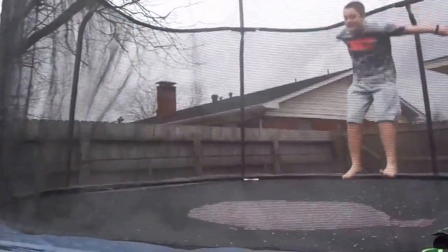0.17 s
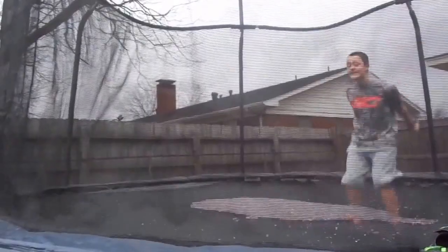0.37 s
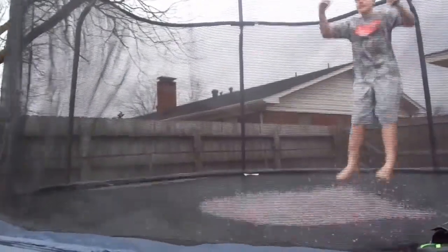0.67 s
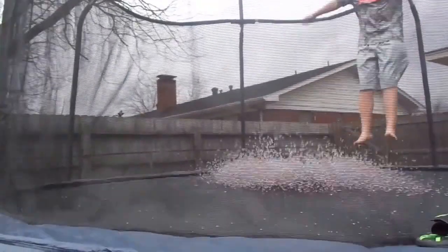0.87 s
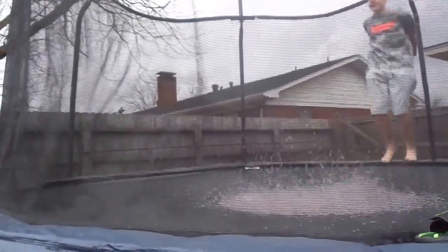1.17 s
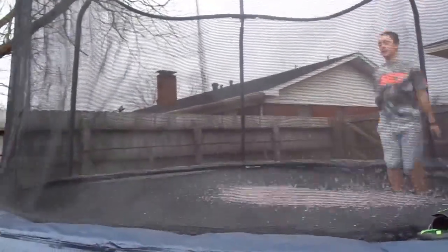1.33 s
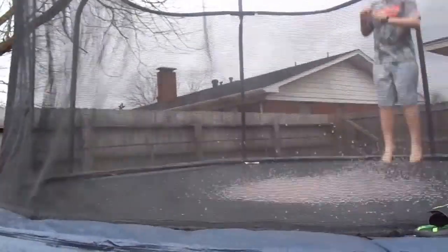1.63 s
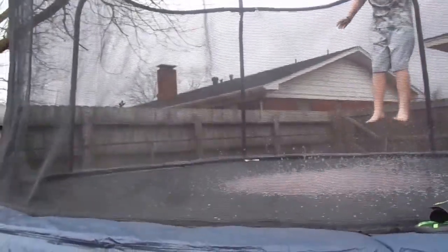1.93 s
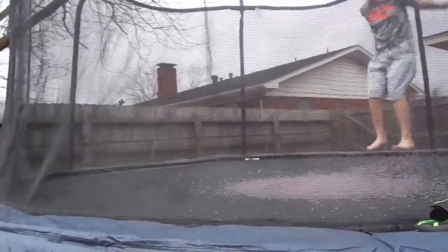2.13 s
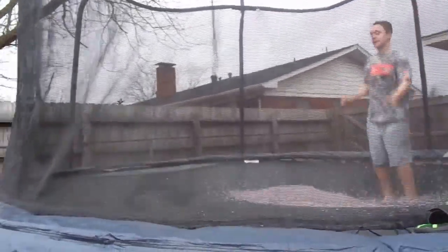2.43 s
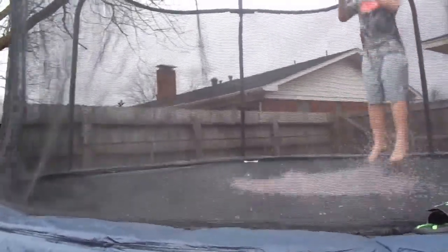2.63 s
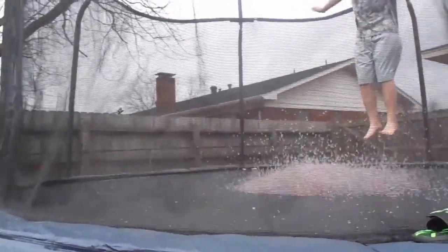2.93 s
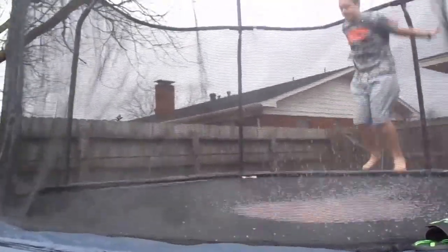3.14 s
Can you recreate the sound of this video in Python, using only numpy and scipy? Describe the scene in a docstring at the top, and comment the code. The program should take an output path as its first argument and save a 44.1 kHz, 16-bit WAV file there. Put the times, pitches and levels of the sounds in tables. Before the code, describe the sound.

Three bounces on an outdoor trampoline: light hook rattles first, then raspy metallic spring creaks at each landing and recoil, with crisp bead patter, soft mat thuds, a tiny squeal and low air flutter at the microphone.

```python
"""Bouncing on a bead-strewn trampoline

Someone bounces three times on a garden trampoline strewn with water beads.
Steel springs creak as each landing stretches them and again as the mat recoils: random slips ring coils and frame.
Slack hooks clank as noise bursts, showers of clicks are beads pattering, and filtered noise buffets the microphone.
Low sines thud in the mat, wavering tones are a squealing hook, and a faint outdoor hush lies under it all, in mono."""
import sys
import numpy as np
from scipy import signal
from scipy.io import wavfile

SR = 44100
rng = np.random.default_rng(int(sys.argv[2]) if len(sys.argv) > 2 else 0)


def generate_wav(signal):
    """Clip the signal to [-1, 1] and save it as 16-bit WAV at the path in sys.argv[1]."""
    frames = np.transpose(np.atleast_2d(signal))
    scaled = np.clip(frames, -1, 1) * 32767
    pcm = np.round(scaled).astype(np.int16)
    wavfile.write(sys.argv[1], SR, pcm)


N = 145530  # samples, 3.3 s

# resonances of the frame tubes: (frequency [Hz], relative level [dB], decay by 60 dB [s])
FRAME_MODES = [(1088.6, -2.5, .2), (1146.4, -4.5, 0.13), (1203.7, -3.5, .18), (1441, -8, .2),
               (1784, -6, .2), (2140, -2, .14), (2259, -1, .2), (2355, 1, .2), (2484.5, -4.5, .16),
               (2574, -7, .16), (2880, -5, .2), (3325, -7.5, .14), (4001, -7.5, .16), (4165, -5.5, .16),
               (4885, -5, .12)]


def amp(db):
    """Decibels to gain."""
    return 10 ** (np.asarray(db) / 20)


def unit(x):
    """Scales to rms 1."""
    return x / np.sqrt(np.mean(x ** 2) + 1e-20)


def read(points, hz):
    """Reads a table on a log-frequency axis."""
    f, value = np.transpose(points)
    return np.interp(np.log(hz + 1), np.log(f + 1), value)


def add(mix, s, sound):
    """Mixes a sound in at time s, cut off at the end of the mix."""
    part = mix[max(round(s * SR), 0):][:len(sound)]
    part += sound[:len(part)]


def ring(x, response):
    """Passes x through a response scaled to energy 1."""
    return signal.fftconvolve(x, response / np.linalg.norm(response))[:len(x)]


def colour(x, points, size=4096):
    """Minimum-phase filter with the given spectral shape, so nothing sounds ahead of its cause."""
    gain_db = read(points, abs(np.fft.fftfreq(size, 1 / SR)))
    log_gain = np.log(amp(gain_db))
    spectrum = np.exp(np.conj(signal.hilbert(log_gain)))
    return ring(x, np.fft.ifft(spectrum).real[:size // 2])


def wander(hz):
    """Smooth random motion below a cutoff, rms 1."""
    lowpass = signal.butter(2, hz, fs=SR, output="sos")
    return unit(signal.sosfilt(lowpass, rng.standard_normal(N)))


def clicks(per_s, spread_db):
    """Random clicks of uneven size and either sign, louder and softer in flurries, rms 1."""
    flurry_db, flurry_hz = 1.4, 55
    size = amp(spread_db * np.minimum(rng.exponential(1, N), 4))
    flurries = amp(flurry_db * wander(flurry_hz))
    sign = rng.choice([-1, 1], N)
    struck = rng.random(N) < per_s / SR
    return unit(size * flurries * sign * struck)


def swell(start, rise, hold, release, db):
    """Quickening rise, hold, then an exponential release that falls 20 dB in the release time."""
    rise_curve = 1.6
    t = np.arange(N) / SR - start
    fall_db = 20 * np.maximum(t - rise - hold, 0) / release
    return amp(db - fall_db) * np.clip(t / rise, 0, 1) ** rise_curve


def modes(rows):
    """Sum of dying sines: each resonance rings at its own pitch and loses level at its own rate."""
    t = np.arange(SR // 3) / SR
    return sum(amp(db - 60 * t / t60) * np.sin(2 * np.pi * (hz * t + rng.random()))
               for hz, db, t60 in rows)


def shimmer(size=256):
    """A dense crowd of faint modes: a noise tail whose decay time varies with pitch, shortest on top."""
    # (frequency [Hz], decay by 60 dB [s])
    tail_t60 = [(200, 0.113), (1000, 0.1556), (2500, 0.169), (6000, 0.0962), (15000, 0.0767)]
    hz, t, z = signal.stft(rng.standard_normal(SR // 3), SR, nperseg=size)
    fade = amp(-60 * t / read(tail_t60, hz)[:, None])
    return signal.istft(z * fade, SR, nperseg=size)[1]


def spring_body(slips):
    """Slips heard directly and, equally strong, through a spring's own crowd of faint modes."""
    # tone of the creaking steel: (frequency [Hz], level [dB])
    creak_colour = [(60, -40), (250, -26), (400, -15), (600, -9), (800, -3.5), (1150, -1), (1500, -1.7),
                    (1900, -1), (2300, -.5), (3200, -3.5), (4900, -5.3), (5900, -12), (9000, -15),
                    (15000, -24.5)]
    body = (slips + ring(slips, shimmer())) / np.sqrt(2)
    return colour(body, creak_colour)


def coil(pitch_hz, count=18):
    """Waves running up and down a coil ring at near multiples of one pitch."""
    # strength of the coil's partials: (frequency [Hz], level [dB])
    coil_colour = [(200, -28.5), (400, -15.5), (800, 2), (1600, -0.5), (2400, 0), (4000, -6), (7000, -15.5),
                   (15000, -34)]
    t60_s, scatter = 0.1745, 0.00291  # scatter: relative mistuning of the partials
    hz = pitch_hz * np.arange(1, count + 1) * (1 + scatter * rng.standard_normal(count))
    return modes([(f, read(coil_colour, f), t60_s) for f in hz])


def springs():
    """Each change of load sets the hooks slipping: random slips ring spring bodies, coils and frame."""
    # springs slipping on their hooks: (start [s], rise [s], hold [s], release to -20 dB [s],
    # level [dB], coil pitch [Hz], coil ring relative to that level [dB])
    creak_swells = [(-.03, 0.018, .02, .1, -43, 371, -14), (0.089, 0.0181, .12, .13, -41, 370, -14),
                    (.25, .04, .07, .1, -52, 369.3, -14), (.365, .07, .022, .19, -21, 401.8, -7.5),
                    (.57, .07, .015, .19, -26, 398.1, 0), (.68, .08, .11, .08, -30.3, 397.4, -12),
                    (.9, .035, .045, .06, -41.5, 374.9, -10), (1.16, .08, .045, .09, -43.5, 374.9, -9),
                    (1.315, .1, .038, .135, -21.7, 412.2, -11), (1.545, .04, .065, .19, -29, 382, -13.5),
                    (1.68, .035, .025, .06, -32.5, 382.2, -11.5), (1.8, .035, .07, .13, -36.5, 375.3, -13),
                    (2.305, .105, .04, .18, -22.7, 397.6, -13),
                    (2.535, .055, .075, 0.0677, -28.2, 375.5, -4),
                    (2.68, .05, .07, 0.1245, -34, 381.7, -11), (2.81, .035, .05, 0.1184, -38, 375.9, -13),
                    (3.095, .025, .05, .1, -45.5, 374.8, -12), (3.17, .03, .025, .13, -40.5, 374.5, -12)]
    slips_per_s, spread_db, frame_db = 2800, 3.5, -8.5
    out, load = np.zeros(N), np.zeros(N)
    # independent clicks for each path, so their powers add
    coil_slips = clicks(slips_per_s, spread_db)
    frame_slips = clicks(slips_per_s, spread_db)
    for start, rise, hold, release, db, pitch_hz, ring_db in creak_swells:
        level = swell(start, rise, hold, release, db)
        load = np.hypot(load, level)
        body_slips = clicks(slips_per_s, spread_db) * level
        out += spring_body(body_slips)
        out += amp(ring_db) * ring(coil_slips * level, coil(pitch_hz))
    return out + amp(frame_db) * ring(frame_slips * load, modes(FRAME_MODES))


def beads():
    """Beads hitting the mat: many tiny bright taps with a short tail."""
    # showers: (start [s], rise [s], hold [s], release to -20 dB [s], level [dB])
    shower_swells = [(-.03, .02, .025, .15, -48), (.07, .04, .135, .12, -48.5), (.37, .045, .1, .14, -28.5),
                     (.55, .07, .06, .1, -37), (.66, .09, .05, 0.21, -31.5), (.91, .04, 0.0316, .1, -46),
                     (1.038, 0.0049, 0.01202, 0.03, -47), (1.15, .07, .07, .1, -44.5),
                     (1.31, .11, .035, .15, -27.5), (1.55, .045, 0.055, .26, -32.5),
                     (1.8, .04, 0.0604, 0.19, -43), (2, .06, 0.059, 0.24, -53.5),
                     (2.19, 0.0294, .04, .08, -47), (2.315, .085, .045, 0.2487, -28),
                     (2.56, .05, 0.062, 0.2739, -37), (2.71, .035, .012, .1, -33),
                     (2.79, .05, .085, .13, -44), (3.1, .015, .04, .08, -52), (3.17, .03, .045, .08, -46)]
    # tone of one tap: (frequency [Hz], level [dB])
    tap_colour = [(100, -19), (500, -8), (1500, -3), (4000, 1), (7500, -1), (11000, -4), (15000, -7.5)]
    taps_per_s, spread_db, tail_db = 6000, 3.1, -4
    level = np.sqrt(sum(swell(*row) ** 2 for row in shower_swells))
    taps = colour(level * clicks(taps_per_s, spread_db), tap_colour)
    return taps + amp(tail_db) * ring(taps, shimmer())


def air():
    """Lumpy turbulence at the microphone: flutter of gliding pitch over a deeper rumble."""
    # (time [s], flutter level [dB], flutter centre [Hz], rumble level [dB])
    air_path = [(0, -66, 300.2, -69), (.28, -68, 299.6, -72), (.32, -48, 289.2, -67),
                (.36, -62.5, 350.2, -66), (0.501, -45.5, 460, -58), (.57, -34, 339.9, -50),
                (.72, -36, 260, -58), (.82, -46, 200, -54.5), (.9, -59, 199.7, -61), (1.01, -56, 310, -66),
                (1.125, -41.5, 290.1, -59), (1.3, -37, 230, -47), (1.49, -34.5, 220, -41),
                (1.65, -39, 280, -53.5), (1.74, -49, 220.4, -50.5), (1.83, -50.5, 200.1, -44.5),
                (1.98, -59, 220.1, -58), (2.13, -57, 220.2, -52.5), (2.3, -57, 280.2, -63),
                (2.45, -50.5, 399.8, -66.5), (2.49, -38.5, 299.9, -52), (2.55, -34.5, 340, -51),
                (2.68, -43, 240.3, -58.5), (2.78, -56, 240.3, -65), (2.93, -62, 219.8, -68),
                (3.03, -46, 250.3, -65), (3.3, -43, 280.2, -63)]
    # flutter before its pitch glides: (frequency [Hz], level [dB])
    flutter_colour = [(30, -30.5), (90, -15), (170, -5), (250, -3), (335, 0), (410, -2), (530, -11),
                      (750, -18.5), (1500, -37), (6000, -72.5)]
    # deep rumble: (frequency [Hz], level [dB])
    rumble_colour = [(15, -14.5), (35, -6), (65, 0), (120, -1), (220, -15), (700, -43.5)]
    flutter_hz = 300  # centre of the flutter when played at its own speed
    gust_db, gust_hz = 1.6, 40
    s, *columns = np.transpose(air_path)
    flutter_db, centre_hz, rumble_db = (np.interp(np.arange(N) / SR, s, c) for c in columns)
    eddies = colour(rng.standard_normal(N), flutter_colour)
    # reading the eddies faster or slower glides their pitch
    place = np.cumsum(centre_hz / flutter_hz) % N
    flutter = np.interp(place, np.arange(N), eddies)
    rumble = colour(rng.standard_normal(N), rumble_colour)
    gusts = unit(amp(gust_db * wander(gust_hz)))
    return gusts * (amp(flutter_db) * flutter + amp(rumble_db) * rumble)


def yard_hush():
    """Distant outdoor hush: steady coloured noise."""
    # (frequency [Hz], level [dB])
    hush_colour = [(20, -12), (100, -8), (220, -6), (330, -2), (650, 1), (1200, -3), (2500, -4.5),
                   (4000, -12), (8000, -17.5), (15000, -24)]
    hush_db = -48.5
    return amp(hush_db) * colour(rng.standard_normal(N), hush_colour)


def clanks():
    """Slack hooks knock: a tick and short chatter ring the spring bodies and the frame."""
    # knocks: (time [s], level [dB])
    knocks = [(.001, -38.5), (.034, -37.5), (.072, -37.5), (.107, -36), (.127, -41), (.152, -41.5),
              (.172, -43.5), (.236, -36.5), (.368, -44), (.381, -40), (.39, -28), (.629, -24),
              (.968, -35.5), (1.042, -32.5), (1.179, -40), (1.341, -31), (1.352, -30), (1.385, -24),
              (1.579, -29.5), (1.817, -35), (1.965, -37.5), (2.007, -37), (2.055, -34), (2.074, -35.5),
              (2.092, -38), (2.12, -42), (2.145, -41), (2.196, -32), (2.219, -29), (2.232, -33),
              (2.255, -40.5), (2.338, -33), (2.35, -31), (3.112, -42)]
    chatter_s, tick, frame_db = 0.01112, 3.8, -4  # time constant; tick against initial chatter rms
    to_body, to_frame = np.zeros(N), np.zeros(N)
    t = np.arange(SR // 8) / SR
    for s, db in knocks:
        for path in to_body, to_frame:  # each path draws its own noise
            chatter = rng.standard_normal(len(t)) * np.exp(-t / chatter_s)
            chatter[0] = tick
            add(path, s, amp(db) * chatter)
    return spring_body(to_body) + amp(frame_db) * ring(to_frame, modes(FRAME_MODES))


def thuds():
    """Short low thuds of the mat: a few soft sine cycles each."""
    # (time [s], frequency [Hz], peak level [dB])
    thud_hits = [(1.288, 130.2, -30), (1.468, 160.7, -25), (2.018, 74.97, -39.5), (2.115, 94.83, -39),
                 (2.838, 139, -37)]
    length_s = 0.02495
    out, t = np.zeros(N), np.arange(int(length_s * SR)) / SR
    for s, hz, db in thud_hits:
        add(out, s, amp(db) * np.hanning(len(t)) * np.sin(2 * np.pi * hz * t))
    return out


def squeaks():
    """A hook squeals: brief high sines of wavering pitch."""
    # (time [s], length [s], frequency [Hz], level [dB])
    squeals = [(1.444, 0.0109, 7450, -23), (1.462, 0.0081, 7747, -33.5), (1.504, 0.0292, 8100, -38.5)]
    waver_depth = 0.01197  # relative pitch change, rms
    out, waver = np.zeros(N), wander(400)
    for s, length, hz, db in squeals:
        window = signal.windows.tukey(int(length * SR))
        pitch_hz = hz * (1 + waver_depth * waver[int(s * SR):][:len(window)])
        turns = np.cumsum(pitch_hz) / SR
        add(out, s, amp(db) * np.sqrt(2) * window * np.sin(2 * np.pi * turns))
    return out


def scene():
    """All sources reach both channels alike."""
    mono = springs() + beads() + air() + yard_hush() + clanks() + thuds() + squeaks()
    return np.array([mono, mono])


def record(dry):
    """The recorder's band limit: a steep low-pass closes off the extreme treble."""
    edge_hz = 15080
    lowpass = signal.firwin(511, edge_hz, window=("kaiser", 9), fs=SR)
    return signal.oaconvolve(dry, lowpass[None], "same")


dry = scene()
out = record(dry)
generate_wav(out)
```